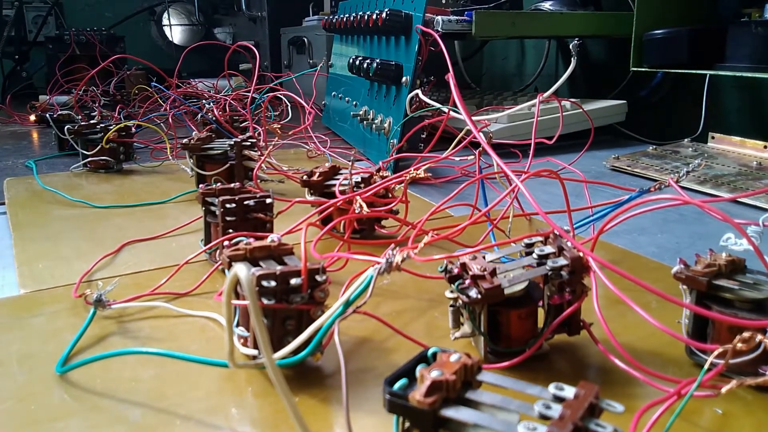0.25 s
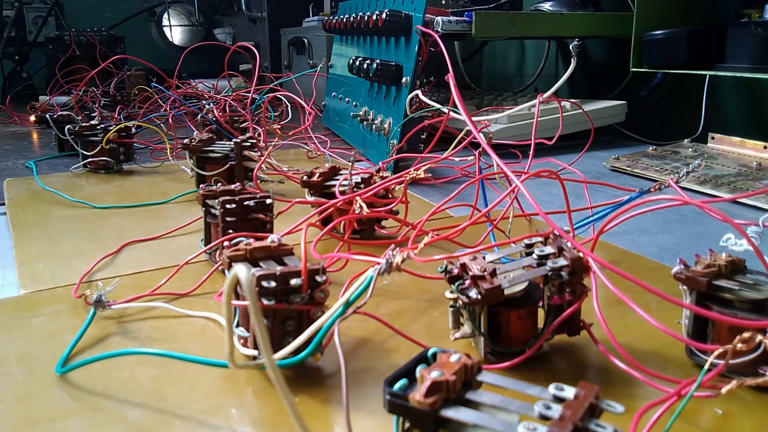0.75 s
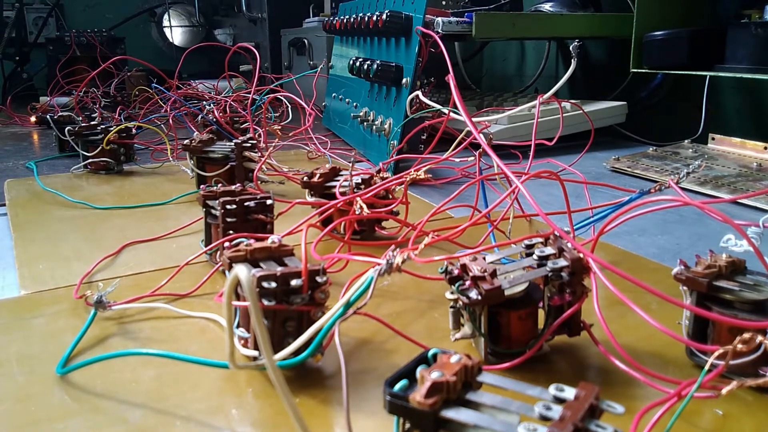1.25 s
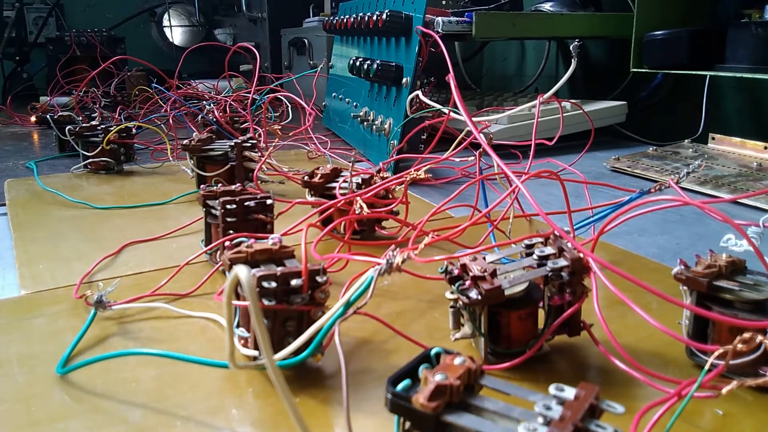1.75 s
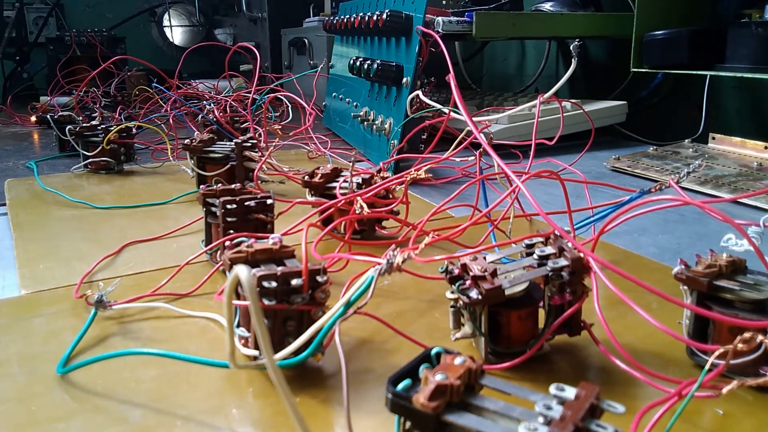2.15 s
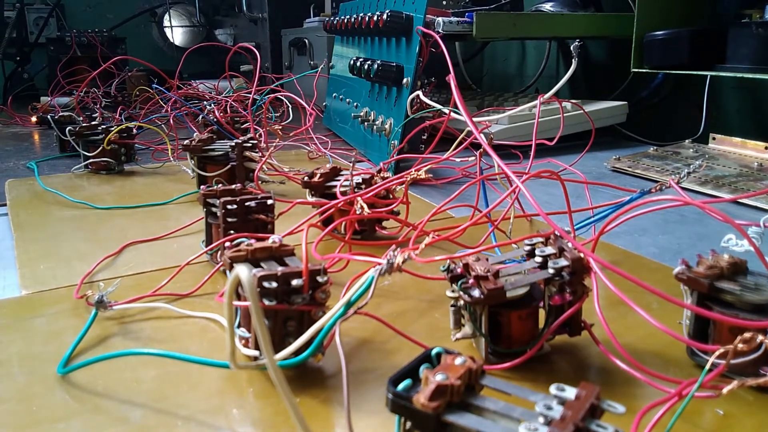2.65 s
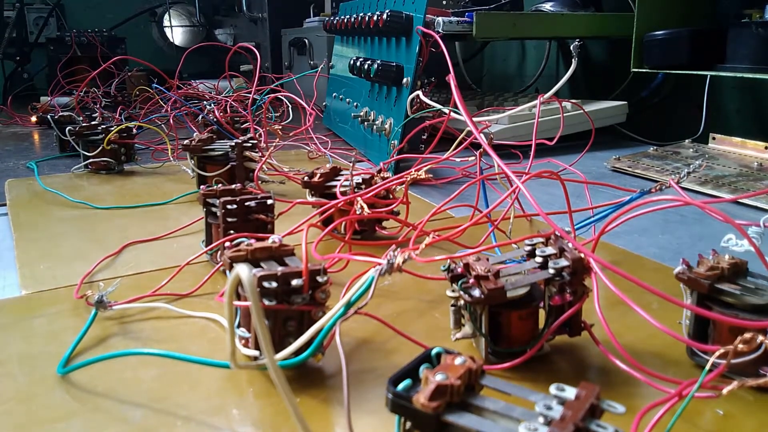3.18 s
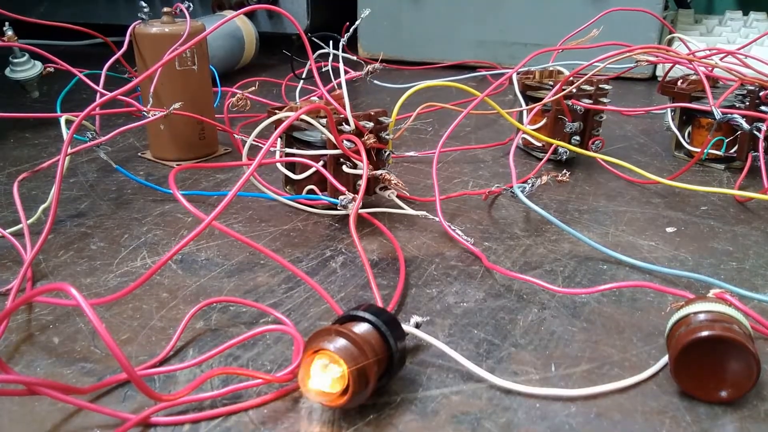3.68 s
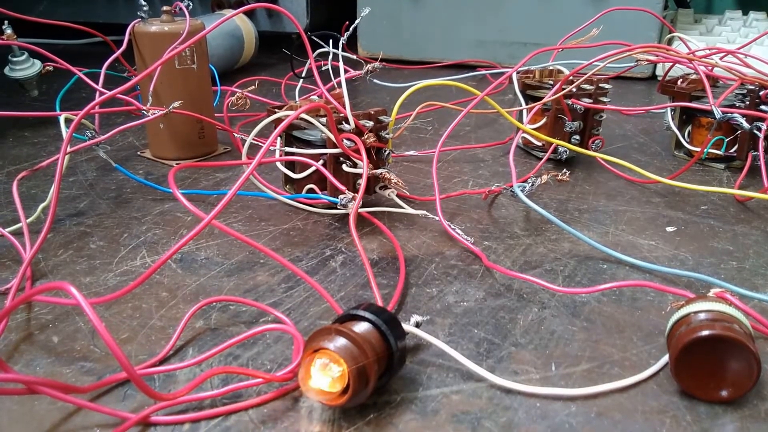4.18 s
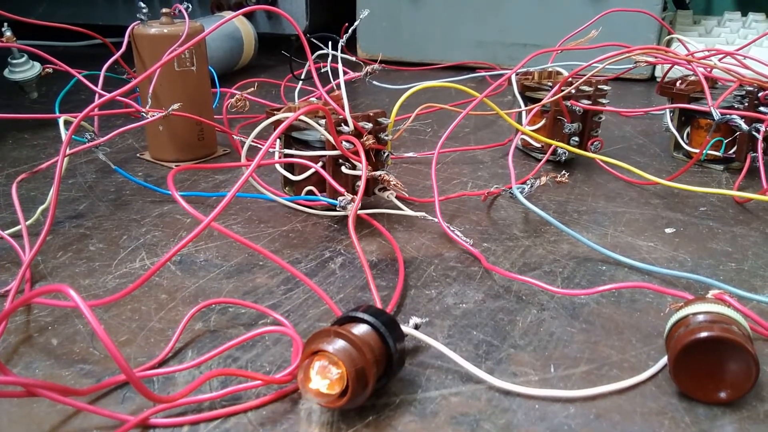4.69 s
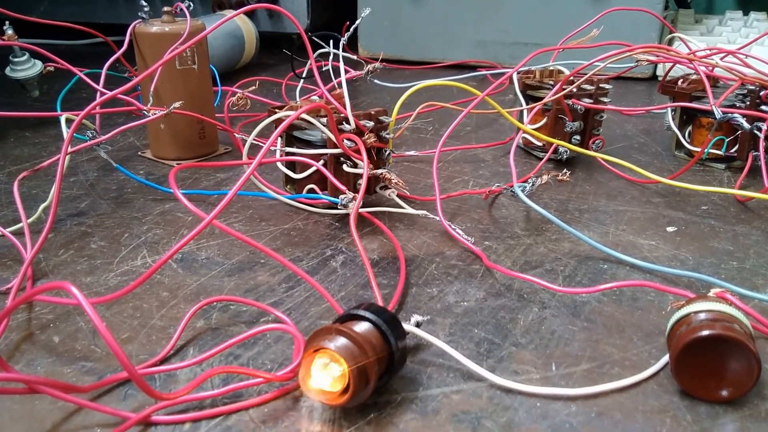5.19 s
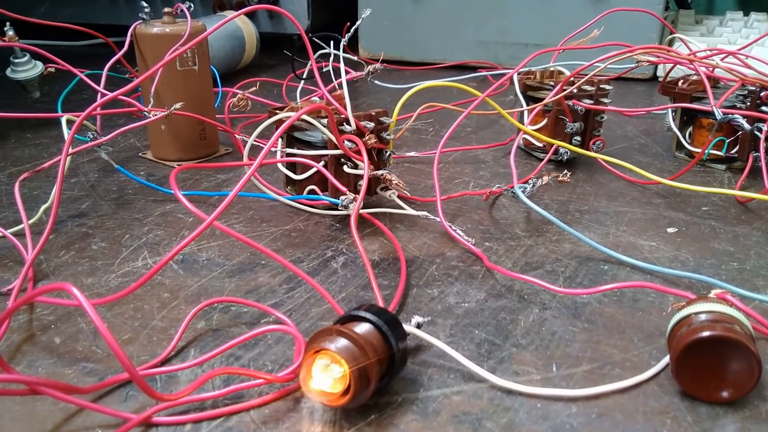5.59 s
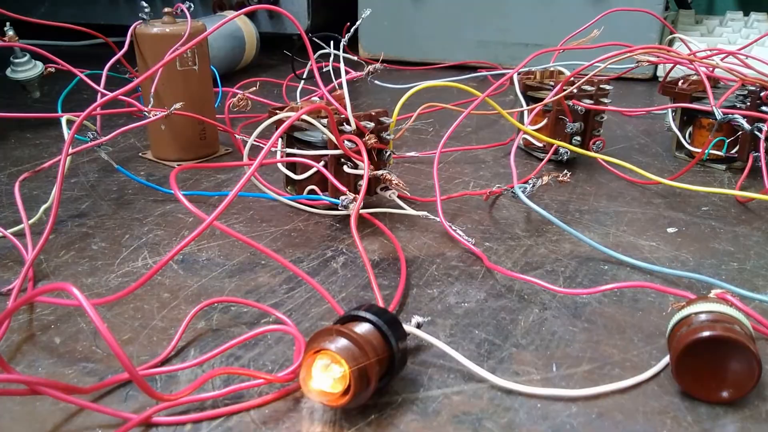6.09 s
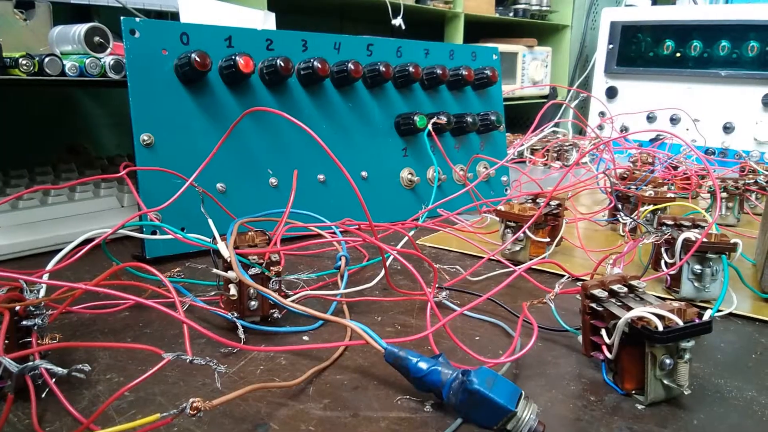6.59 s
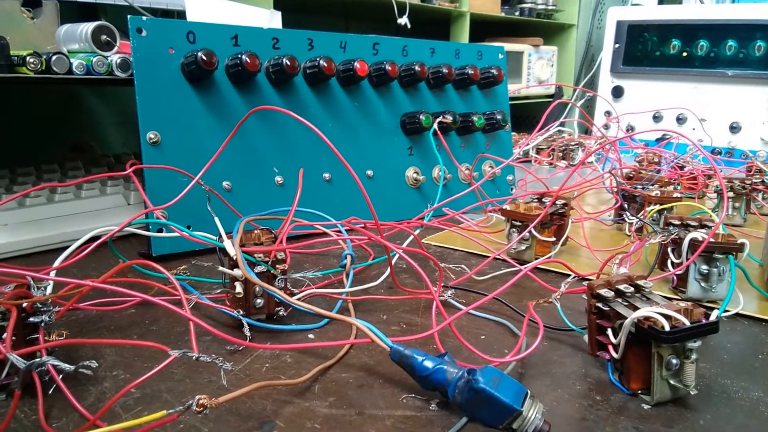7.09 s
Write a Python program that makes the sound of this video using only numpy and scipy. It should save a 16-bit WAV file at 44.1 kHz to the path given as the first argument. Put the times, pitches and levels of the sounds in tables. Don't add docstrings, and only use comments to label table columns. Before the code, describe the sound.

Close up on a workbench, electromechanical relays snap about three times a second, single hard clacks alternating with brief rattling multi-relay clatters. The scene cuts to one blinker relay ticking quicker, quieter and very evenly. Another cut brings back the relay chain, loud and more than twice as fast as at first. Bright dry clicks, a faint indoor ring, low murk and light hiss; the phone microphone gates the gaps.

```python
import sys
import numpy as np
from scipy import signal
from scipy.fft import rfft, irfft
from scipy.io import wavfile
from scipy.ndimage import uniform_filter1d

SR = 44100
rng = np.random.default_rng(int(sys.argv[2]) if len(sys.argv) > 2 else 0)


def boost_factor(decibels):
    exponent = np.asarray(decibels, float) / 20
    return 10 ** exponent


def int16_out(signal):
    q = np.round(np.clip(np.atleast_2d(signal).T, -1, 1) * 32767)
    wavfile.write(sys.argv[1], SR, q.astype(np.int16))


N = 323694
PAD = 8192
SLAP_T = np.arange(2048) / SR

# start_s, end_s
SCENES = [
    (0, 3.238),
    (3.2485, 6.2125),
    (6.2575, 7.4),
]
SCENE_HISS_DB = [-64, -66.5, -54]

# landing_s, level_db, frame_db
COUNTS = [
    (.276, -2, -12.5),
    (0.9503, -3.5, -22),
    (1.6228, -3, -25),
    (2.3083, -5.5, -25),
    (2.9847, -3, -17),
    (6.5307, -2.5, -16.5),
    (6.8009, -3, -11.5),
    (7.0747, -2.5, -11),
]
# close_s, level_db
COUNT_CONTACTS = [(.263, -22), (0.933, -22), (1.6086, -19.5), (2.2917, -21), (2.9712, -17), (6.5181, -8),
                  (6.7849, -10.5), (7.061, -9)]
# first_touch_s, rattle_length_s, rattle_db
CARRIES = [
    (0.5926, .047, -27),
    (1.2683, 0.058, -26.5),
    (1.942, .047, -30),
    (2.634, .063, -29),
    (6.376, 0.052, -35.5),
    (6.639, 0.025, -27),
    (6.9164, 0.034, -27),
    (7.1888, .052, -33),
]
# touch_s, level_db
THIRD_TOUCHES = [(0.6106, -10.5), (1.2869, -7.5), (1.9611, -10), (2.6608, -10), (6.3981, -14.5),
                 (6.663, -6.5), (6.9378, -18), (7.2097, -11.5)]
# landing_s, level_db, pitch_hz,
# frame_db, chatter_ms
LANDINGS = [(-.03, -8.5, 5500, -4.5, 8.2), (0.0343, -10, 6800, -26, 3.3), (0.6236, -18, 5700, 2.5, 4.3),
            (0.6318, -1, 4830, -10, 5.8), (1.3011, -4.5, 6000, -23, 2.4), (1.3105, -3, 6400, -9.5, 1.8),
            (1.9813, -5, 4860, -7.5, 11), (2.6715, -6, 6260, -5, 2.1), (2.6987, -2.5, 5470, -21, 5.3),
            (6.18, -15, 6460, 0, 12), (6.215, -13, 5800, -21, 7.9), (6.3, -30.5, 5900, -25, 82),
            (6.4098, -17.5, 4230, 2, 5.5), (6.4186, -10.5, 6340, -14, 4.8),
            (6.4297, -10.5, 6600, -15.5, 2.8), (6.6821, -.1, 4560, -8, 3), (6.6933, -14.5, 6920, -25, 2.3),
            (6.9572, -7.5, 5900, 0.5, 8.4), (6.9618, -1, 5750, -8, 3), (7.2344, -3.5, 4010, -8.5, 1.6),
            (7.2406, -7, 6130, -36, 5.1), (7.3351, -10, 6870, -50, 3.3)]
# release_s, level_db, rebound_db
RELEASES = [(0.7053, -15.5, -19.5), (1.3776, -16, -18), (2.0628, -18.5, -17), (2.7385, -15.5, -13.5)]
# tick_s, level_db, frame_db
TICKS = [(0.0482, -19, -49), (0.9635, -38, -31), (1.0063, -24, -16), (1.0632, -35, -36), (1.3177, -26, -6),
         (2.0536, -16, -7.5), (2.358, -25, -10.5), (3.0176, -34, 0), (6.575, -16, -17),
         (6.8508, -13.5, -22), (6.8693, -34, 2.5), (6.9461, -26, -6), (7.121, -17.5, -27),
         (7.2926, -18, -25), (7.3192, -26.5, -23)]

# pitch_hz, frame_db, sizzle_db, chatter_ms
FIRST_CONTACT, SECOND_CONTACT = (7203.5, -30, -14.5, 6), (7001.5, -32.5, -9, 6.0)
TOUCH, FRAME_KNOCK, THIRD_TOUCH = (4895.5, -8.5, -9.5, 15), (5406.5, 5, -7, 20.5), (6104, -13.5, -6, 3)
RELEASE, RELEASE_REBOUND = (6511, -7, -10.5, 2), (6503, -11, -23.5, 4)
COUNT_HZ, COUNT_SIZZLE_DB, LANDING_SIZZLE_DB = 5880, -18.5, -15
TICK_HZ, TICK_SIZZLE_DB, TICK_MS = 5900, -13.5, 23
# first_contact_db, count_chatter_ms, touch_db, knock_db, chatter_share, bounce_db
SLOW_PACE, FAST_PACE = (-6, 3.5, -17.5, -25, 1.73, -6.5), (-6.5, 1, -21, -21, 1.03, -9)
FAST_FROM_S = 5
SLOW_GAP_S, FAST_GAP_S = .0108, .0122
BOUNCE_S, BOUNCE_HZ = .0032, 7600
RELEASE_REBOUND_S, RATTLE_LEAD_S = .0152, .012
KNOCK_SHARE = .5

# delay_s, level_db, pitch_hz, chatter_ms
PULL_IN = [
    (-.0036, -21, 4600, 2.5),
    (0, -1, 6400, 1.0),
    (.0047, -11, 6300, 1.5),
    (.0078, -17, 6800, 2),
    (.017, -17, 8000, 2),
]
# blink_number, extra_db
ODD_BLINKS = [
    (15, -3),
    (18, 3),
    (19, -2),
    (21, -3),
    (22, 3),
]
BLINK_START_S, BLINK_PERIOD_S, BLINK_COUNT = 3.22757, .13511, 23
PULL_DB, PULL_SCATTER_DB, DROP_DB, DROP_SCATTER_DB = -18, 1.3, -37.5, -1.5
DROP_LEAD_S, REBOUND_S, REBOUND_DB = .0425, .0121, -5

# pitch_hz, level_db, t60_s
CHAIN_SPRINGS = [(3080, -6, 0.0055), (3510, 7.5, 0.0044), (3990, 5.5, 0.0045), (4670, 5.5, 0.0054),
                 (4860, 5.5, 0.0043), (5350, 5, 0.005), (5674, 3.5, 0.0084), (5900, 8.5, 0.0037),
                 (6353, 9.5, 0.0028), (6970, 11, 0.0048), (6957, 8.5, 0.0055), (7570, 1, 0.0068),
                 (7960, -3, 0.01), (8090, 3, 0.0051), (9340, -6.5, 0.0049), (10430, -0.5, 0.0069)]
# pitch_hz, level_db, t60_s
BLINKER_SPRINGS = [(2740, -4.5, 0.00077), (3520, 2.5, 0.0052), (3920, 2.5, 0.0043), (4510, 1.5, 0.0072),
                   (5300, -3.5, 0.0061), (6162, 0.5, 0.0058), (6640, 3, 0.0049), (7900, -3.5, 0.0032),
                   (8760, 2, 0.0061), (9650, 3, 0.0043)]
# pitch_hz, level_db, t60_s
FRAME = [(1170, -8, 0.0054), (1438, -6.5, .006), (1744, -2, 0.0045), (2320, 0.5, 0.009),
         (2560, -3.5, 0.0068), (2990, -6.5, 0.0092)]
# pitch_hz, level_db, t60_s
BENCH = [(150, -1.5, 0.075), (463, -1, 0.02), (898, -1, 0.02), (585, -8, 0.02)]
# pitch_hz, level_db, t60_s
ROOM_CHAIN = [(296, -30, 0.097), (1060, -36.5, 0.29), (2300, -37, 0.28), (3440, -37.5, 0.29),
              (5000, -38, 0.4), (7200, -38, 0.44), (10600, -39, 0.57), (13000, -41.5, 0.38)]
# pitch_hz, level_db, t60_s
ROOM_BLINKER = [(997, -39, 0.21), (2180, -21.5, 0.093), (4070, -40, 0.047), (5240, -36, 0.26),
                (6070, -35, 0.27), (8670, -34, 0.28), (12600, -27, 0.22)]

# start_s, level_db, pitch_hz
THUDS = [(0.029, -32.5, 326), (0.586, -32, 397), (0.627, -27.5, 477), (0.702, -27.5, 408),
         (0.928, -32, 413), (1.305, -30, 140), (1.378, -29, 228), (1.887, -26, 423), (2.061, -28, 192),
         (2.644, -34.5, 180), (2.672, -29.5, 279), (2.984, -36, 585), (3.667, -50, 370), (3.817, -40, 227),
         (3.92, -41, 484), (3.99, -43, 313), (4.072, -42, 306), (4.183, -54, 253), (4.543, -51, 265),
         (4.709, -53, 269), (4.758, -47, 507), (4.864, -47.5, 517), (4.949, -44, 266), (5.045, -47, 446),
         (5.119, -48, 306), (5.17, -47, 307), (5.292, -50.5, 231), (5.809, -57, 210), (5.971, -50, 213),
         (6.118, -40, 236)]
# start_s, end_s, level_db
RUMBLE_SWELLS = [(-.1, .06, -43), (3.44, 3.7, -66), (5.36, 5.47, -69), (5.56, 5.85, -60.5),
                 (6.35, 7.12, -45)]
# start_s, end_s, level_db
AIR_SWELLS = [(-.1, .08, -48), (3.75, 4.2, -72.5), (4.7, 5.25, -69.5), (6.11, 6.19, -66.5),
              (6.42, 7.15, -41.5)]
# start_s, end_s, level_db
DRONE_SWELLS = [(.3, 1.2, -56.5), (1.84, 2.1, -48.5), (2.72, 3.1, -53.5), (3.78, 4.12, -64),
                (4.72, 5.15, -67.5), (6.4, 7.15, -46.5)]
RUMBLE_DB, AIR_DB, DRONE_DB, SWELL_RISE_S = -64, -65.5, -67, 0.04
LIFT_CARRY_DB, LIFT_COUNT_DB, LIFT_T60_S, LIFT_RUMBLE_DB = -42, -51, .6, -14.5
# pitch_hz, level_db
HISS_COLOUR = [(290, -11), (500, 10), (2740, 0.5), (3940, -4), (5060, -12), (6410, -11), (7070, -23.5),
               (14000, -24)]
# close_s, reopen_s, depth_db
GATE = [(0.19, 0.243, -19), (.467, 0.588, -15.5), (0.828, 0.914, -4), (1.14, 1.261, -18),
        (1.487, 1.597, -4), (1.843, 1.939, -9), (2.212, 2.273, -15), (2.518, 2.613, -30)]
GATE_CLOSE_S, GATE_OPEN_S = 0.06, .015


def chain(rows, carries, wet_db, bench_db):
    near, far, knocks = slaps(rows, CHAIN_SPRINGS, focus_hz=1030, touch_db=-28, grit=5.5, count=4)
    soft_knocks = signal.fftconvolve(knocks, np.hanning(SR // 1500))[:len(knocks)]
    bench_ring = ring(BENCH, 0, np.arange(PAD) / SR)
    bench = boost_factor(bench_db) * signal.fftconvolve(soft_knocks, bench_ring)[:len(knocks)]
    rattle = scrape(carries)
    far[0] += bench + rattle
    echo = [(hz, db + wet_db, t60) for hz, db, t60 in ROOM_CHAIN]
    sound = room(near + rattle, far, echo, early_db=13.0)
    low = band(sound + bench[PAD:PAD + N], 130, 1000) * boost_factor(-12.5)
    return band(sound, 725, 28000) + low


def steps(fast, pace, gap_s):
    first_db, count_ms, touch_db, knock_db, share, bounce_db = pace
    rows = [(s, db, hz, frame_db, LANDING_SIZZLE_DB, ms) for s, db, hz, frame_db, ms in LANDINGS]
    rows += [(s, db, TICK_HZ, frame_db, TICK_SIZZLE_DB, TICK_MS) for s, db, frame_db in TICKS]
    for (s, db, frame_db), (closes, lead_db) in zip(COUNTS, COUNT_CONTACTS):
        rows += [(closes - gap_s, lead_db + first_db, *FIRST_CONTACT),
                 (closes, lead_db, *SECOND_CONTACT),
                 (s, db, COUNT_HZ, frame_db, COUNT_SIZZLE_DB, count_ms),
                 (s + BOUNCE_S, db + bounce_db, BOUNCE_HZ, frame_db, COUNT_SIZZLE_DB, count_ms)]
    for (s, _, _), (third, third_db) in zip(CARRIES, THIRD_TOUCHES):
        rows += [(s, touch_db, *TOUCH),
                 (s + KNOCK_SHARE * (third - s), knock_db, *FRAME_KNOCK),
                 (third, third_db, *THIRD_TOUCH)]
    for s, db, rebound_db in RELEASES:
        rows += [(s, db, *RELEASE), (s + RELEASE_REBOUND_S, rebound_db, *RELEASE_REBOUND)]
    rows = [(*row[:-1], row[-1] * share) for row in rows]
    rattles = [(s - RATTLE_LEAD_S, s + length, db) for s, length, db in CARRIES]
    return [sorted(row for row in table if (row[0] > FAST_FROM_S) == fast) for table in (rows, rattles)]


def scrape(spans):
    t = (np.arange(PAD + N + 2 * len(SLAP_T)) - PAD) / SR
    swell = sum(boost_factor(db) * np.interp(t, [start, start + 0.017, end, end + 0.016], [0, 1, 1, 0])
                for start, end, db in spans)
    grit = rng.standard_normal(len(t)) * boost_factor(2.9 * rng.standard_normal(len(t)))
    return swell * unit(band(grit, 1100, 9000) + 0.229 * band(grit, 8400, 16000))


def blinker():
    beats = blinks()
    pulls = [(s + delay, db + blow_db, hz, -46, -17, ms)
             for s, db, _ in beats for delay, blow_db, hz, ms in PULL_IN]
    drops = [(s - DROP_LEAD_S + lag + REBOUND_S * late, db + REBOUND_DB * late + off_db, hz, -22, -22, 5)
             for s, _, db in beats for late in (0, 1)
             for lag, hz, off_db in [(0, 3060, -1.7), (.0012, 6600, -11)]]
    near, far, _ = slaps(pulls + drops, BLINKER_SPRINGS, focus_hz=636, touch_db=-40, grit=2.86, count=2)
    sound = room(near, far, ROOM_BLINKER, early_db=22)
    return band(band(sound, 2800, 25000), 2800, 24000)


def blinks():
    extra_db = np.zeros(BLINK_COUNT)
    for number, db in ODD_BLINKS:
        extra_db[number] = db
    chance = np.clip(rng.standard_normal((BLINK_COUNT, 2)), -1.5, 1.5)
    start_s = BLINK_START_S + BLINK_PERIOD_S * np.arange(BLINK_COUNT)
    pull_db = PULL_DB + extra_db + PULL_SCATTER_DB * chance[:, 0]
    drop_db = DROP_DB + DROP_SCATTER_DB * chance[:, 1]
    return list(zip(start_s, pull_db, drop_db))


def slaps(rows, modes, focus_hz, touch_db, grit, count):
    t = SLAP_T
    s, db, hz, frame_db, sizzle_db, ms = np.transpose(rows)[:, :, None]
    chance = rng.standard_normal((len(rows), 2 * len(t) + len(modes)))
    sign, size, colour = np.split(chance, [len(t), 2 * len(t)], axis=1)
    lead = int(.0035 * SR)
    rattle_out = np.exp(-(t - t[lead]) / (np.maximum(ms, .3) * 0.00038))
    push = np.where(t < t[lead], boost_factor(touch_db), rattle_out) * sign * boost_factor(grit * size)
    off = (np.array(modes)[:, 0] - hz) / focus_hz
    springs = ring(modes, -6 * np.sqrt(1 + off ** 2) + 2.2 * colour)
    frame = ring(FRAME, 3 * colour[:, :len(FRAME)])
    sizzle = band(np.eye(1, len(t)), 6230, 16500)
    sound = blow = 0
    for body, level_db in [(springs, db), (frame, db + frame_db), (sizzle, db + sizzle_db)]:
        part = signal.fftconvolve(push, body, axes=1)[:, :len(t)]
        loudest = uniform_filter1d(part ** 2, size=70).max(axis=1, keepdims=True)
        part *= boost_factor(level_db) / np.sqrt(2 * loudest)
        sound = sound + part
        part_size = np.linalg.norm(part, axis=1, keepdims=True)
        blow = blow + body * part_size / np.linalg.norm(body, axis=1, keepdims=True)
    near, knocks = np.zeros((2, PAD + N + 2 * len(t)))
    far = np.zeros((count, len(near)))
    place = np.arange(len(rows))[:, None] % count
    at = PAD + (s * SR).astype(int)
    np.add.at(near, at - lead + np.arange(len(t)), sound)
    np.add.at(far, (place, at + np.arange(len(t))), blow * np.sign(sign[:, :1]))
    np.add.at(knocks, at[:, 0], boost_factor(db + .5 * frame_db)[:, 0] * np.sign(sign[:, 1]))
    return near, far, knocks


def ring(modes, weight_db, t=SLAP_T):
    hz, db, t60 = np.transpose(modes)
    phase = np.pi * np.arange(len(hz))[:, None]
    shapes = np.sin(2 * np.pi * hz[:, None] * t + phase) * fade(t, t60[:, None])
    return boost_factor(db + weight_db) @ shapes


def room(near, far, table, early_db):
    t, tail = np.arange(SR // 2) / SR, 0
    hz, db, t60 = np.transpose(table)
    for f in 150 * 2 ** np.arange(0, 6.8, .25):
        band_db = np.interp(np.log(f), np.log(hz), db)
        band_t60 = np.interp(np.log(f), np.log(hz), t60)
        noise = unit(band(rng.standard_normal((len(far), len(t))), f / 1.09, f * 1.09))
        noise *= np.sqrt(f * .35 / SR)
        tail = tail + boost_factor(band_db) * noise * fade(t, band_t60)
    tail *= np.minimum(t / 0.0066, 1) * (1 + boost_factor(early_db) * np.exp(-t / 0.0028))
    echo = signal.fftconvolve(far, tail, axes=1).sum(axis=0)[:len(near)]
    return (near + echo)[PAD:PAD + N]


def thuds():
    s, db, hz = np.transpose(THUDS)[:, :, None]
    t = np.arange(PAD // 2) / SR
    bumps = boost_factor(db - 0.5) * np.sin(2 * np.pi * hz * t) * np.minimum(t / 0.004, 1) * fade(t, 0.094)
    out = np.zeros(N + len(t))
    np.add.at(out, (s * SR).astype(int) + np.arange(len(t)), bumps)
    return out[:N]


def murk():
    t = np.arange(N) / SR
    kicks = [(s + length, LIFT_CARRY_DB) for s, length, _ in CARRIES]
    kicks += [(s, LIFT_COUNT_DB) for s, _, _ in COUNTS]
    lift = sum(boost_factor(db) * (t > s) * fade(np.abs(t - s), LIFT_T60_S) for s, db in kicks if s < FAST_FROM_S)
    lift = uniform_filter1d(lift, size=1300)
    rumble = unit(band(band(rng.standard_normal(N), 36, 91), 37, 110))
    air = flicker([(140, 54, 3.8), (210, 35, 5.7), (307, 68, 5)])
    drone = flicker([(419.1, 7, 4.5), (360.4, 34, 3.0), (492, 44, 3.5), (614, 70, -8), (820, 57, -4)])
    rumble_level = swells(RUMBLE_SWELLS, RUMBLE_DB) + boost_factor(LIFT_RUMBLE_DB) * lift
    air_level = swells(AIR_SWELLS, AIR_DB) + lift
    return rumble_level * rumble + air_level * air + swells(DRONE_SWELLS, DRONE_DB) * drone


def flicker(bands):
    return unit(sum(boost_factor(db + 4.2 * walk(22)) * unit(band(rng.standard_normal(N), hz - wide_hz, hz + wide_hz))
                    for hz, wide_hz, db in bands))


def swells(rows, floor_db):
    t = np.arange(N) / SR
    return boost_factor(floor_db) + sum(
        boost_factor(db) * np.interp(t, [a - SWELL_RISE_S, a, b, b + SWELL_RISE_S], [0, 1, 1, 0]) ** 2
        for a, b, db in rows)


def hiss():
    f = np.maximum(np.fft.rfftfreq(N, 1 / SR), 1)
    hz, db = np.transpose(HISS_COLOUR)
    colour = boost_factor(np.interp(np.log(f), np.log(hz), db))
    return unit(irfft(rfft(rng.standard_normal(N)) * colour, N))


def band(x, lo_hz, hi_hz):
    limits = [lo_hz, min(hi_hz, .45 * SR)]
    return signal.sosfilt(signal.butter(2, limits, "band", fs=SR, output="sos"), x)


def unit(x):
    return x / np.sqrt(np.mean(x ** 2))


def fade(t, t60_s):
    return np.exp(-np.log(1000) * t / t60_s)


def walk(rate_hz):
    k = int(SR / rate_hz)
    held = np.repeat(rng.standard_normal(N // k + 1), k)
    return uniform_filter1d(uniform_filter1d(held, k), k)[:N]


def scene():
    t = np.arange(N) / SR
    relays = [chain(*steps(False, SLOW_PACE, SLOW_GAP_S), wet_db=1.35, bench_db=-37),
              blinker(),
              chain(*steps(True, FAST_PACE, FAST_GAP_S), wet_db=1.0, bench_db=-29.0)]
    gate_db = sum(np.interp(t, [a, min(a + GATE_CLOSE_S, b), b, b + GATE_OPEN_S], [0, db, db, 0])
                  for a, b, db in GATE)
    low, high = murk() + thuds(), hiss()
    out = np.zeros(N)
    for sound, hiss_db, (start, end) in zip(relays, SCENE_HISS_DB, SCENES):
        present = np.clip(np.minimum(t - start, end - t) / .001, 0, 1)
        gated = boost_factor(gate_db) * (sound + boost_factor(hiss_db) * high)
        out += present * (gated + boost_factor(0.26 * gate_db) * low)
    return out[None]


def top_cut(x):
    return signal.sosfilt(signal.butter(12, 15590, fs=SR, output="sos"), x)


def record(dry):
    full = np.clip(band(dry, 45, 25000), -.9, .9)
    cut = signal.sosfilt(signal.ellip(8, .2, 60, 14200, fs=SR, output="sos"), full)
    return top_cut(np.clip(cut, -1, 1))


dry = scene()
out = record(dry)
int16_out(out)
```